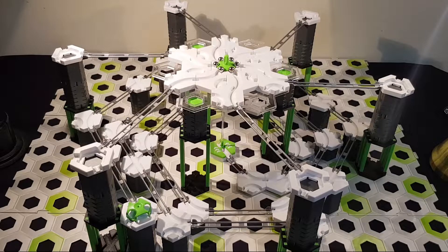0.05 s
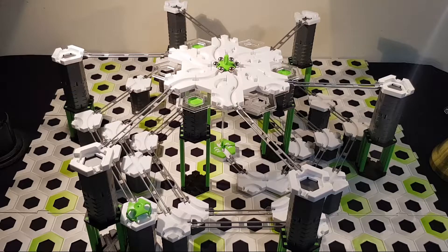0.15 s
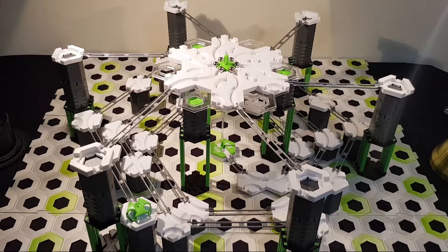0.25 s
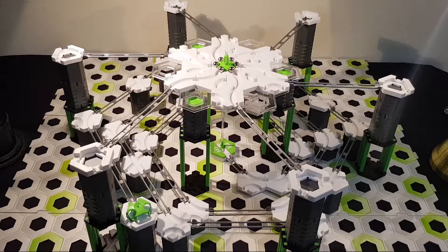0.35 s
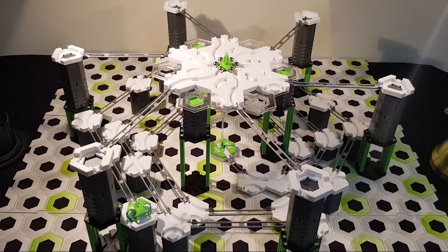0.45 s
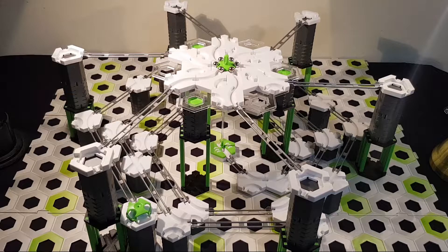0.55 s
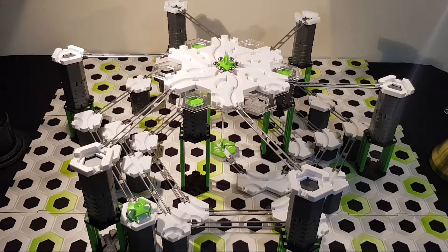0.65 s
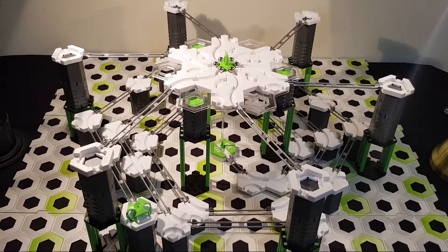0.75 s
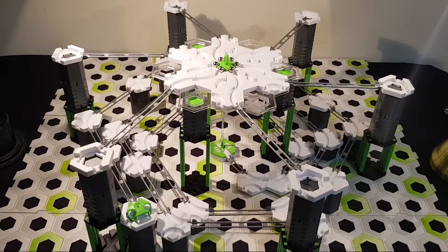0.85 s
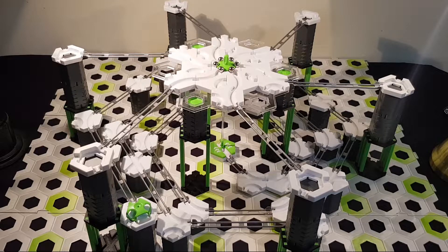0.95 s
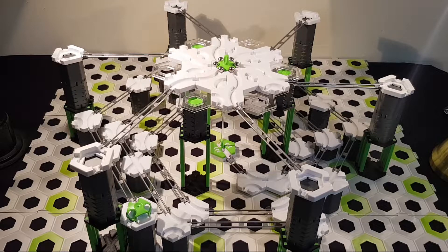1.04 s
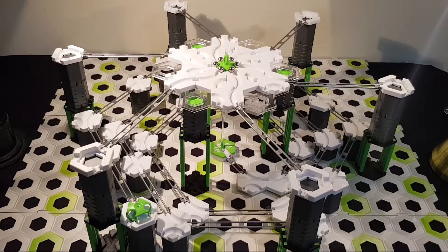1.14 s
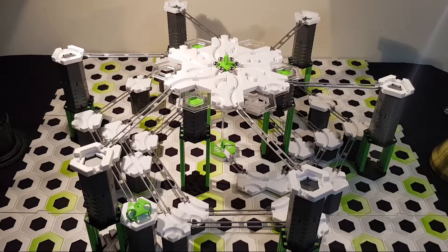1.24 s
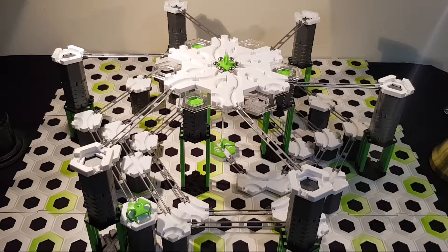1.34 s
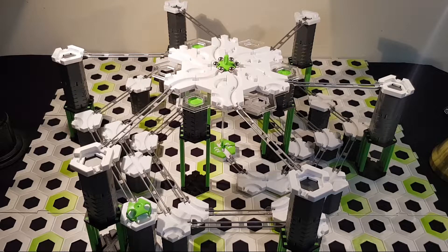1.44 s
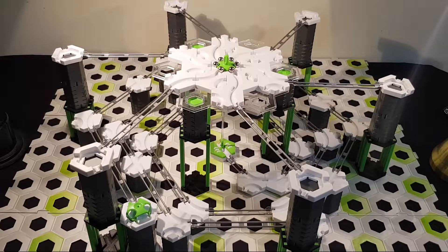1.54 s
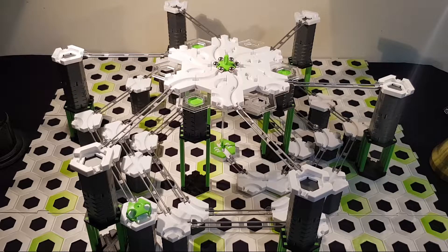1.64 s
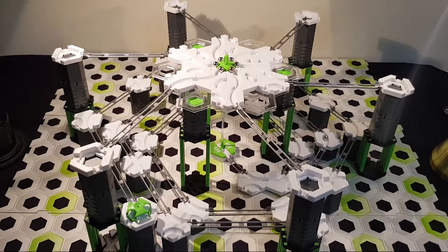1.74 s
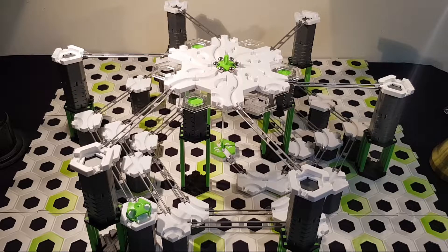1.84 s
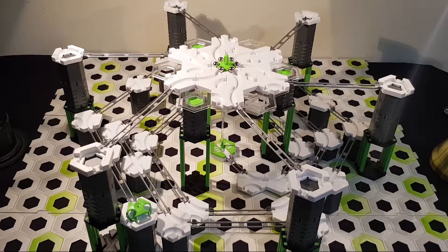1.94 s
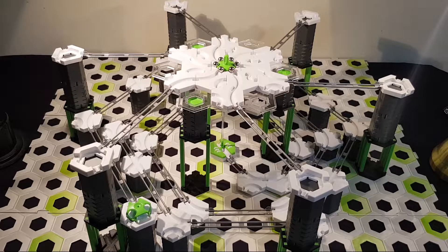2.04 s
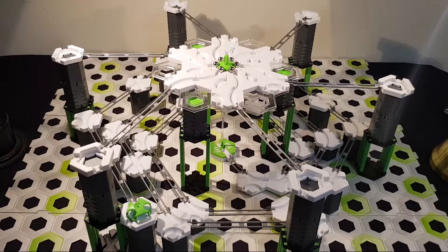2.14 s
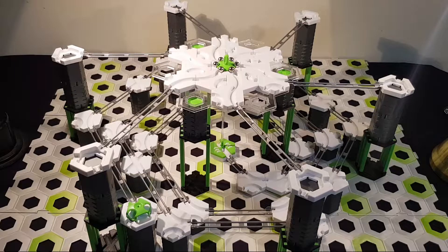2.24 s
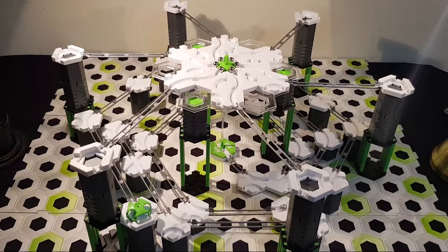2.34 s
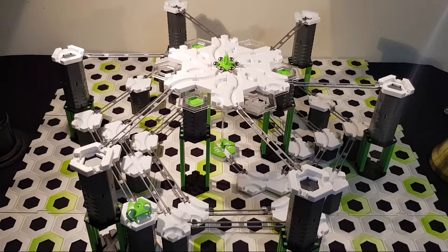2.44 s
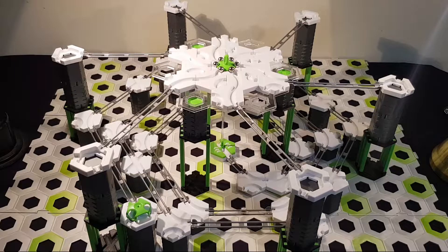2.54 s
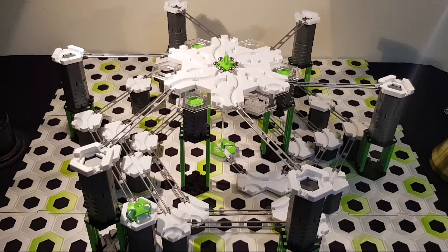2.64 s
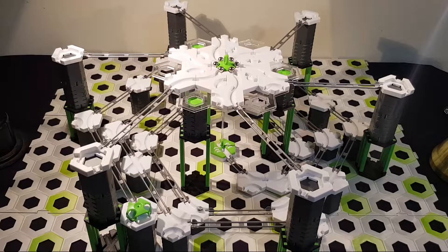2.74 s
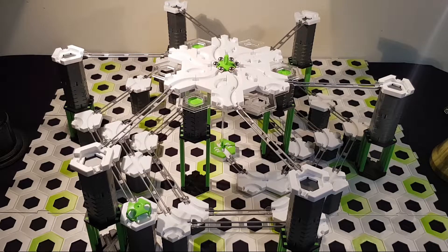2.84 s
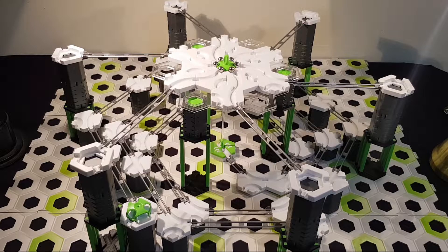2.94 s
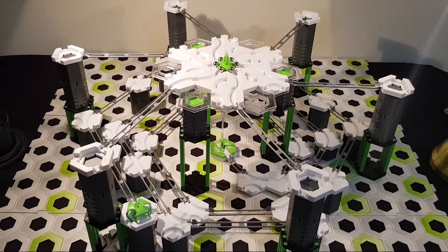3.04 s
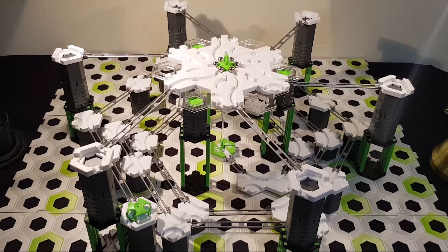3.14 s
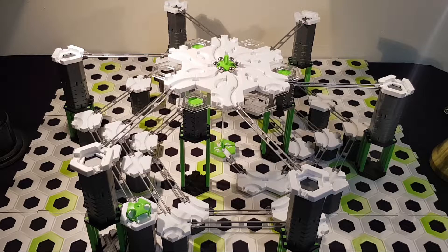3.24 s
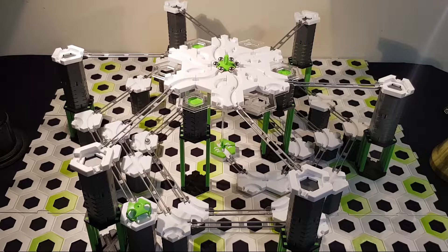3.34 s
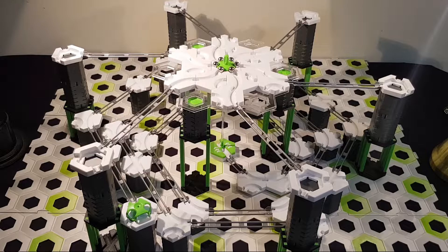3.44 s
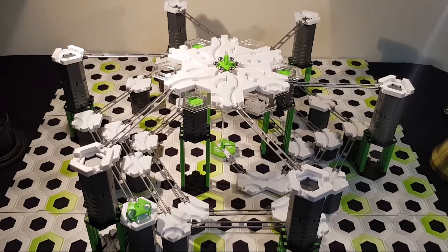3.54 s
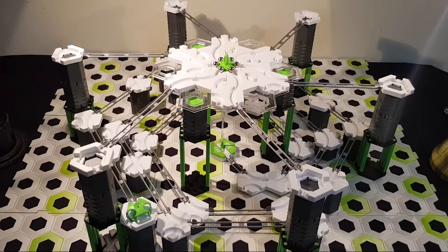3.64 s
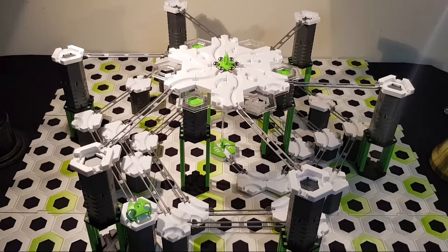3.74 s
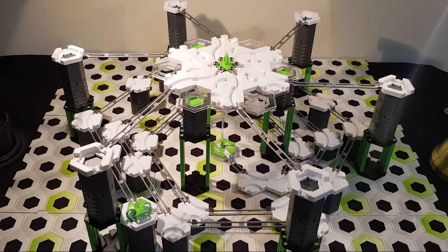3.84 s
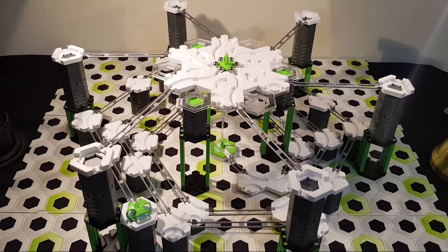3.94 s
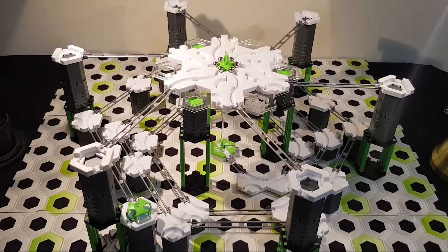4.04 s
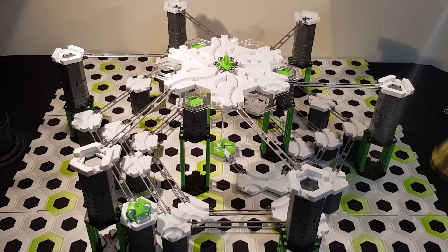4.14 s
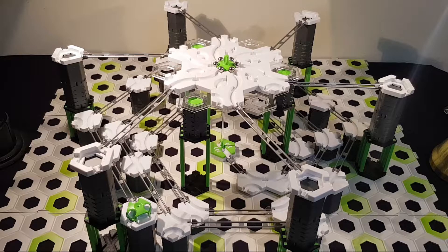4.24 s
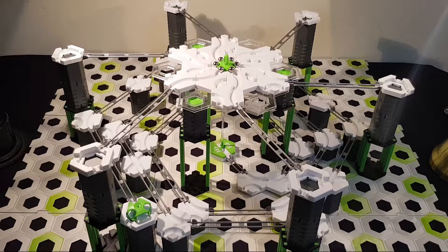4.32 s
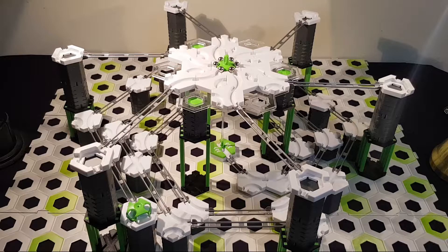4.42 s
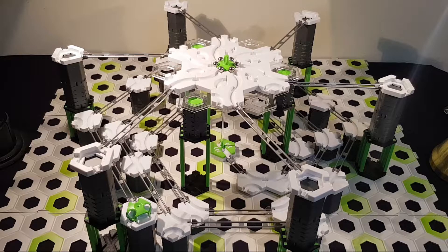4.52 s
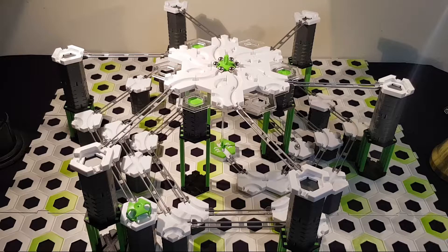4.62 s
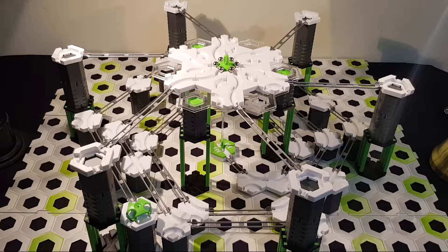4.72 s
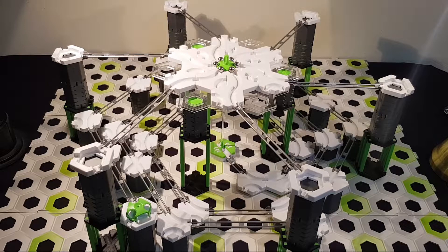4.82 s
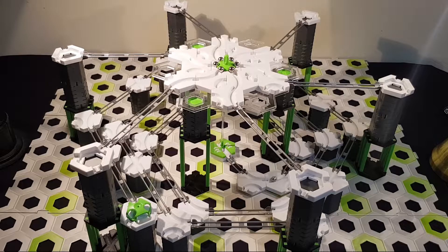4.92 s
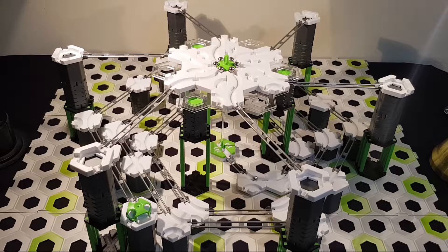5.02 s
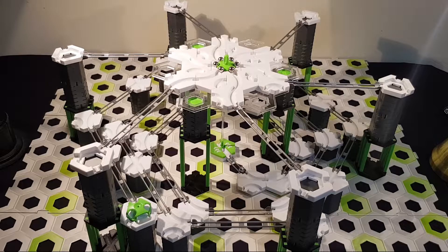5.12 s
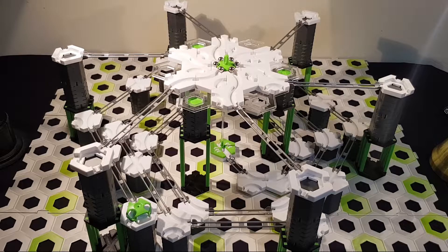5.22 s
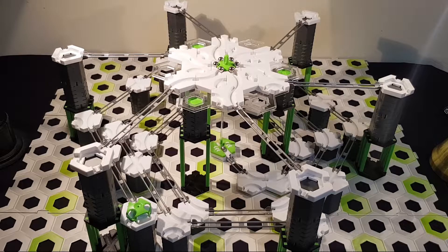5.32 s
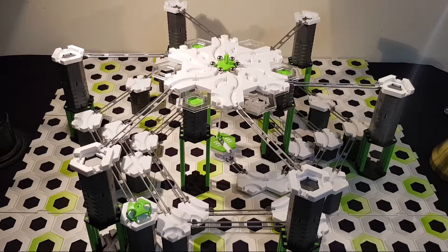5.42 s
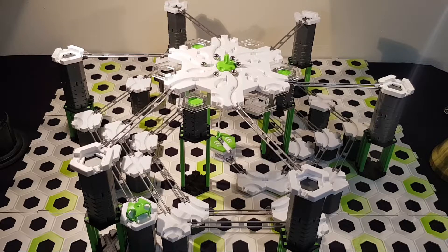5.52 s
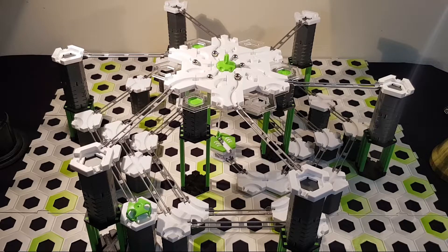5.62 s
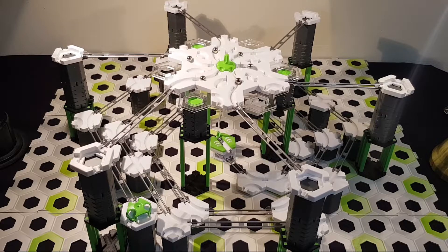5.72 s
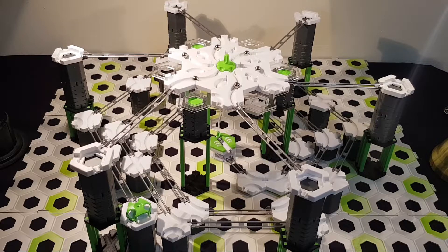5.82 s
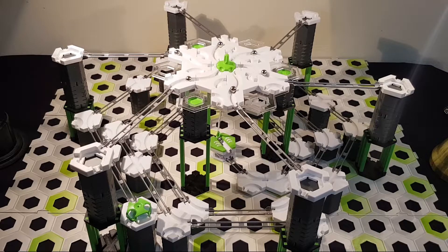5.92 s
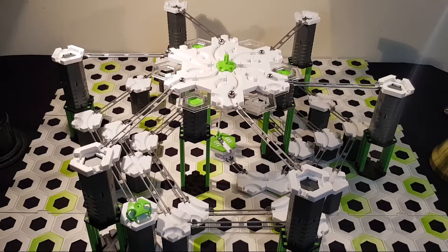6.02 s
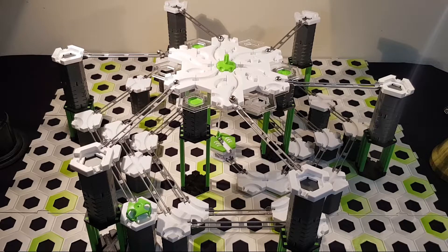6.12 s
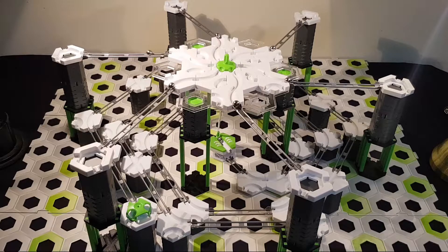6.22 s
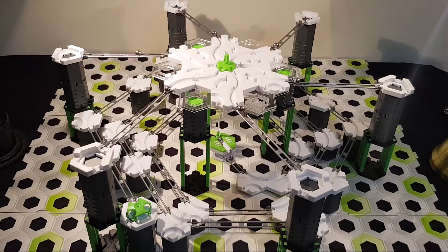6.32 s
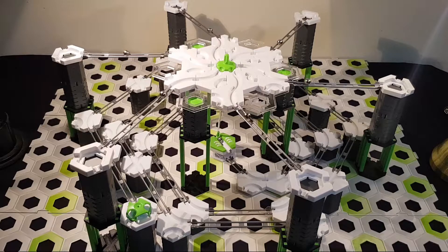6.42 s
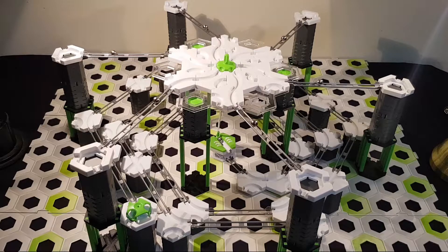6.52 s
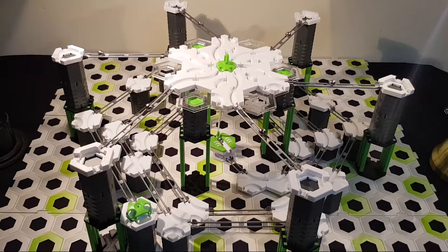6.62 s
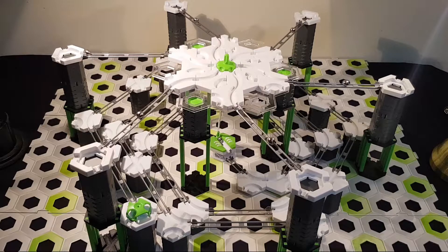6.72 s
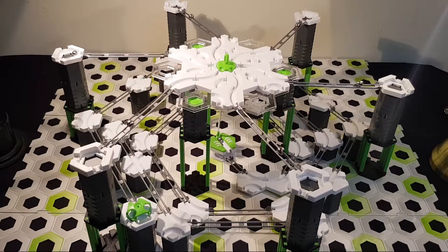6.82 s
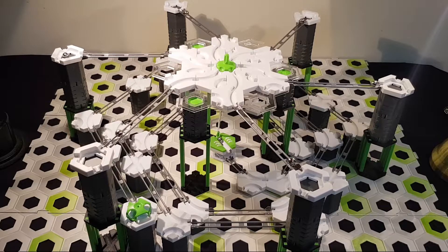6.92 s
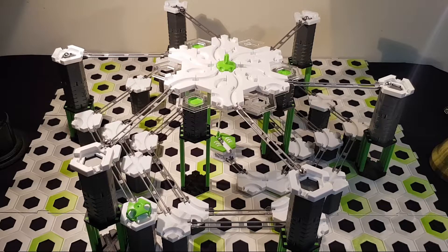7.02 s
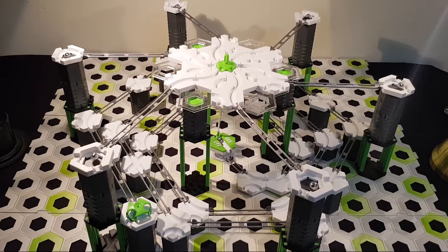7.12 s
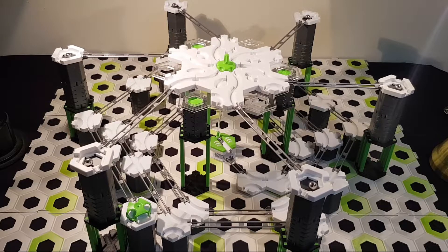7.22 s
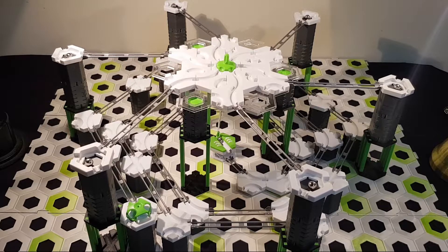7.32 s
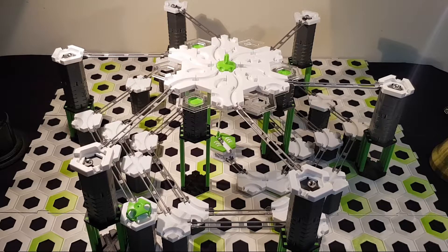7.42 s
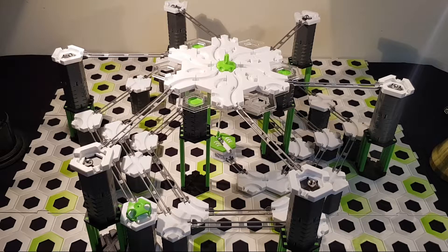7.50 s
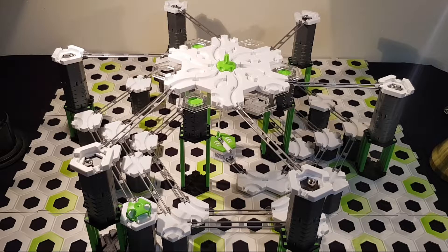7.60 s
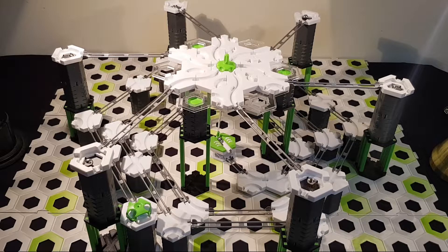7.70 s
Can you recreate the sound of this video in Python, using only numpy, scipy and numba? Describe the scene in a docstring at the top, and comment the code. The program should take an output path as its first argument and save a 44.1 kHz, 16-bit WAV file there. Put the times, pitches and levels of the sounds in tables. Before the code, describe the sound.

In a quiet room with a short, dry echo, a phone close to a tabletop marble run picks up steel balls on plastic tiles and metal rails. From 0 s they roll with a grainy, mid-high ring, crossing a hollow tile about every half second, with crisp irregular clicks at the joints; a harder snap comes near 1.7 s and another at 3.5 s. From 4.1 to 4.9 s the knocks crowd together, bright and quick, and sharp cracks hit at 5.3-5.4 s. From 5.5 to 6.7 s it eases into duller, hollow rolling that fades, with small ticks and one brighter tap near 6.3 s. Thuddy clacks at 6.85-6.9 s lead to the loudest moment, a dense metallic pile-up at 7.03-7.27 s. It stops quickly; one or two tiny taps around 7.6 s remain over low rumble and faint hiss.

```python
"""Marble run on a table, close to a phone

Steel marbles run down wire rails and over plastic tiles, an arm's length or less from a stereo phone in a
quiet room. Each knock is a burst of chattering contacts; rolling roughness rings the track piece underfoot,
and the tiles drum hollow. A last pile-up clatters into a cup. Decaying noise makes the room's answer,
coloured noise its low rumble and faint hiss, and the phone's gain ducks under the clatter."""
import sys
import numpy as np
from scipy import signal
from scipy.fft import rfft, irfft
from scipy.io import wavfile
from scipy.ndimage import uniform_filter1d
from numba import njit

SR = 44100
rng = np.random.default_rng(int(sys.argv[2]) if len(sys.argv) > 2 else 0)


def transcribe(u):
    """Save the signal u as a 16-bit wav file named by the first command-line argument.

    u: samples, shape (n,) or (channels, n), limited to [-1, 1]; the rate is SR.
    q: integer samples, one column per channel.
    """
    v = np.clip(np.atleast_2d(u).T, -1, 1)
    q = np.round(v * 32767).astype(np.int16)
    wavfile.write(sys.argv[1], SR, q)


N = 342206  # samples

# Source levels below are relative: marbles() trims each layer.
# Room noise, a spectrum. Each row: frequency in Hz, level in dB per Hz.
ROOM_NOISE = [(20, -40), (40, -6), (56, 10), (75, -8), (105, -2.5), (200, -18), (500, -28.5), (1500, -30),
              (3000, -37.5), (7300, -46.5), (12000, -34), (16000, -35)]
ROOM_NOISE_DB = -53.5
ROOM_T60_S, ROOM_DB, ROOM_SHARED_HZ = 0.25, -2, 900  # echo; the ports differ more above the last
LEFT_DB, SPREAD_S = 1.5, 0.00023  # left port up and right port down by this; lag of thuds at the right port
# Rolling on the rails, joined by straight lines. Each row: time in seconds, piece ring in dB, rattle in dB.
RAILS = [(0.0, -52, -56), (0.24, -66.5, -58), (1.77, -54.5, -50.5), (4.23, -56.5, -55), (4.69, -62, -48),
         (5.01, -52, -73), (5.38, -60, -36.5), (5.64, -47.5, -57.5), (6.53, -59.5, -58.5), (6.79, -55, -57),
         (7.07, -46.5, -33), (7.15, -48, -50), (7.37, -77.5, -80), (7.76, -93, -78)]
# Marbles crossing tiles. Each row: start in seconds, length in seconds, piece ring in dB, tile drum in dB,
# rattle in dB, tile pitch in Hz on entering, tile pitch in Hz on leaving.
CROSSINGS = [(-0.08, 0.19, -49, -47, -52, 330, 296), (0.532, 0.15, -49.5, -53.5, -68, 664, 574),
             (1.114, 0.17, -46.5, -52, -52, 810, 370), (1.667, 0.14, -49, -42, -61, 397, 398),
             (2.252, 0.16, -45.5, -53, -52, 660, 590), (2.711, 0.14, -42, -48, -48, 440, 464),
             (3.275, 0.2, -49.5, -52, -48, 533, 710), (3.685, 0.27, -42, -48, -41.5, 716, 744),
             (4.135, .1, -40, -44, -38, 480, 466), (4.541, 0.16, -41, -50.5, -55, 664, 630),
             (4.888, 0.27, -59.5, -50.5, -49.5, 696, 400), (5.202, 0.2, -58, -56, -57, 380, 470),
             (5.362, 0.14, -31.5, -41, -34, 730, 517), (5.539, 0.66, -49, -43.5, -70, 550, 690),
             (6.819, 0.2, -67.5, -39.5, -55.5, 457, 386), (7.031, 0.21, -41, -31.5, -21.5, 420, 534),
             (7.54, 0.058, -78, -64, -71, 787, 697)]
ON_S, OFF_DB_PER_S = 0.038, 179.5  # the tile takes the load, and falls silent once left
RING_SAG_DB, RATTLE_AT, RATTLE_WIDTH = 9.5, 0.77, 0.31  # ring fades across a tile; rattle peaks at this share
# Steel knocks at the joints. Each row: time in seconds, crack in dB, then piece ring, tile thud and bright
# edge in dB over the crack, and the chatter's 60 dB decay in seconds.
KNOCKS = [(0.052, -28.5, -13, -26, -15, 0.11), (0.121, -22.5, -6, -20, -10, 0.038),
          (0.3257, -55.5, -1, 16, -21, .044), (0.4992, -24.5, -37, -22, -12, 0.065),
          (0.5446, -28, 3.5, -3, -19, 0.032), (0.6892, -32.5, -3, -21, -26, 0.057),
          (0.7412, -35, -7.5, -19, -22, 0.069), (1.0854, -20.5, -29, -35, -10, 0.064),
          (1.1158, -24, -17, -16.5, -24, 0.11), (1.255, -33, -4.5, -17, -21.5, 0.2),
          (1.315, -19.5, -2.5, -42, -16.5, 0.037), (1.655, -23, -5, -32, -13, 0.033),
          (1.662, -10.5, -22, -32, -13, 0.029), (1.685, -19, -19, -39, -14, 0.062),
          (1.839, -27.5, -5.5, -16, -18, 0.082), (1.897, -18.5, -7, -20, -13, 0.038),
          (2.2448, -17.5, -37, -43, -13, 0.05), (2.272, -28, -1, -38, -21, 0.15),
          (2.4436, -22, -9, -34, -29, 0.032), (2.4855, -22.5, -14.5, -40, -26, 0.05),
          (2.5075, -31, -20, -26, -17, 0.024), (2.6838, -22, -15, -40, -24, 0.072),
          (2.7155, -21, -10, -17.5, -20, 0.068), (2.7748, -33, 16.5, -10, -31, 0.024),
          (2.862, -25.5, -40, -20, -13.5, 0.11), (2.92, -21.5, -17, -29, -17.5, 0.056),
          (3.151, -42.5, -11, -24, -21, 0.093), (3.2646, -20, -34, -26, -13, 0.054),
          (3.292, -15, -40, -38, -20, 0.046), (3.3208, -23, -30, -27, -14.5, 0.072),
          (3.444, -34, -32, -30, -22, 0.27), (3.501, -26, 4, -33, -11.5, 0.035),
          (3.5244, -10.5, -8, -33, -21, 0.019), (3.702, -19, -31, -36, -17, 0.058),
          (3.743, -19, -0.5, -16, -24, 0.034), (3.874, -30.5, -3, -50, -12.5, 0.086),
          (3.931, -29, -2.5, -33, -15, .067), (3.969, -34, 14.5, -19, -25, 0.022),
          (4.1225, -29, -11.5, -20, -11.5, 0.19), (4.1619, -14, -40, -40, -13, 0.058),
          (4.295, -21.5, -14, -38, -21, .046), (4.318, -16, -1, -38, -19, 0.018),
          (4.3491, -15.5, 0.5, -28, -10, 0.027), (4.375, -18, -22, -14, -20, 0.031),
          (4.471, -31, -30, -36, -17, 0.046), (4.521, -32.5, -13, -46, -24, 0.048),
          (4.5432, -6.5, -36, -47, -11.5, 0.02), (4.58, -16.5, -37, -45, -9.5, 0.032),
          (4.711, -29.5, -2.5, -33, -16, 0.039), (4.7394, -14.5, -29, -39, -18, 0.021),
          (4.774, -14, -1.5, -39, -12, 0.019), (4.8218, -16.5, -34, -34, -20, 0.037),
          (4.852, -21, -13, -25, -25, .03), (4.8685, -29.5, 2.5, -6.5, -17.5, 0.076),
          (4.9661, -43, 2, -13, -14, 0.037), (4.986, -37, 3, -12, -17, .077),
          (5.125, -27.5, -28, -28, -20.5, 0.051), (5.148, -15, -19, -8, -14.5, 0.022),
          (5.1982, -17.5, -22, -16, -25, 0.019), (5.234, -31, -38, -27.5, -12.5, 0.078),
          (5.2775, -37.5, -17.5, 2, -8, 0.083), (5.33, -7, -38.5, -15.5, -5.5, .025),
          (5.3909, -8.5, -1, -31.5, -8, 0.037), (5.467, -25, 9, -3, -25, 0.033),
          (5.478, -26, 13.5, 5, -30, .045), (5.5493, -26.5, 9, 5.5, -29, .034),
          (5.5913, -24, 4.5, -21, -18, 0.033), (5.629, -35.5, 14.5, 13, -35, 0.036),
          (5.7516, -44, 4, -24, -23, 0.054), (5.8924, -39, 13, -12, -16, 0.038),
          (5.9384, -39.5, 9.5, -28, -30, 0.062), (5.951, -45.5, 1, -28, -18, 0.071),
          (6.155, -38, 3.5, -13, -26, 0.059), (6.2756, -24.5, 5.5, -10, -4.5, 0.021),
          (6.36, -35.5, -14, -3.5, -14, 0.091), (6.429, -35, -0.5, -25, -30, 0.035),
          (6.7136, -33, -13, -8, -16, .073), (6.794, -41.5, -21, 8.5, -21.5, 0.092),
          (6.8425, -18, -3.5, 4.5, -12, .035), (6.8811, -10, -3.5, 2.5, -7.5, 0.034),
          (6.919, -14.5, -7, 3.5, -9.5, 0.056), (6.9955, -30.5, -5, -27, -11, 0.095),
          (7.0395, -11.5, -17, -18.5, -11.5, 0.046), (7.054, -21, 4.5, -21.5, -15.5, 0.032),
          (7.0646, -12.5, 0.5, -23.5, -10, 0.031), (7.0835, -6.5, -2, -32, -4.5, 0.021),
          (7.0953, 2, -11.5, -27.5, -21, 0.031), (7.1218, -6.5, 6.5, -24, -10, 0.021),
          (7.1336, -6.5, -1.5, -23, -11.5, 0.028), (7.1525, -3, -2.5, -20, -8, 0.033),
          (7.176, -7, -2, -13, -18, .03), (7.19, -7.5, -6, -20, -11.5, 0.034), (7.2, -16, 1, -28, -23, .04),
          (7.216, -16, -3, -23, -19, 0.053), (7.2454, -9, -5, -28, -13.5, 0.033),
          (7.27, -20.5, 2, -54, -25, 0.043), (7.5525, -46, 0.5, -17, -23.5, 0.11),
          (7.633, -52, -18, 12, -19, 0.058)]
RISE_S = 0.0029
KNOCK_PAN_DB, PAN_SCATTER_DB = 3, 1.5  # left over right
# Faint ticks at random moments. One row: crack in dB over the rail ring, scatter in dB, then ring, thud and
# edge in dB over the crack, and a decay in seconds that knocks() lifts to its shortest.
TICK = (12, 1, -9.5, -31, -9, -0.46)
TICKS = 45
# Hand-over of the marbles to the next track piece: times in seconds.
PIECE_FROM = [.5, 1.09, 1.661, 2.25, 2.691, 3.27, 3.7, 4.131, 4.54, 4.849, 5.361, 6.801, 7.54]
# Resonances of the track pieces in turn, a list for each. Each row: frequency in Hz, width in Hz (ring()
# widens narrow ones), level in dB relative to the others of its piece.
PIECES = [
    [(1280, 146, -2), (2810, 140, -11.5), (5150, 78, -14)],
    [(1570, 340, 5), (2070, 30, -15), (3070, 290, -12), (4740, 240, 1.5)],
    [(1438, 15, 1), (1564, 280, 15), (3180, 110, -2), (3900, 130, 6)],
    [(1580, 210, -5), (2400, 210, -12.5), (3860, 110, -15), (5040, 130, -23)],
    [(1578, 150, 8), (2410, 290, 4), (3770, 91, -2), (4970, 130, -4.5)],
    [(1402, 143, 12), (2860, 350, 2.5), (4860, 77, -3), (5100, 23, 1.5)],
    [(1470, 380, 15), (3080, 82, 4.5), (4400, 100, -22), (4980, 78, 6)],
    [(1486, 470, 11), (1815, 83, -1), (5200, 99, -10), (5630, 16, -20)],
    [(1300, 49, 4.5), (1850, 26, -1.5), (3430, 37, -15), (3904, 190, -0.5)],
    [(1355, 200, -2), (2690, 200, -8), (3940, 280, -1.5)],
    [(1570, 250, 4.5), (2770, 420, 2), (3950, 56, 0.5)],
    [(1053, 200, -6), (1335, 340, 9), (2760, 130, -3)],
    [(1384, 260, -3), (3000, 130, -38), (4200, 120, -29), (4540, 270, -9.5)],
    [(906, 12.4, -6), (1670, 110, -7)],
]
CLIMB = 0.036  # share by which a piece's modes rise while the marble runs along it
# Tile and table. One row: tile width in Hz, table board in Hz, board width in Hz, board level in dB.
TILE = (415, 105, 63, -11)
# Air under the tiles. One row: frequency in Hz, width in Hz, level in dB.
HOLLOW = (463, 94, -15)
# Steel crack, a spectrum. Each row: frequency in Hz, level in dB per Hz.
CRACK = [(410, -52.5), (700, -31), (1040, -20.5), (1250, -4), (2470, -12), (3160, -4.5), (3510, -10.5),
         (4000, -5), (4490, -6.5), (9000, -16), (11700, -37), (19800, -120)]
# Bright edge on the crack, a spectrum. Each row: frequency in Hz, level in dB per Hz.
EDGE = [(3530, -28), (6000, -0.5), (9900, -9.5), (10900, -0.5), (16000, -15)]
# Short ring of the struck spot, new at each knock. One row: lowest Hz, highest Hz, width in Hz, level in dB.
PING = (3700, 6200, 450, -13)


def undb(db):
    """Decibels to gain."""
    return 10 ** (np.asarray(db) / 20)


def unit(x):
    """Scale to rms 1."""
    return x / np.sqrt(np.mean(x ** 2))


def walk(rate, size):
    """Random levels, a new one each 1 / rate s, joined by slews; spread near 1."""
    k = int(SR / rate)
    steps = np.repeat(rng.standard_normal(size // k + 1), k)
    return uniform_filter1d(steps, k)[:size]


def colour(x, points):
    """Causal filter that follows (Hz, dB) points, built from the folded cepstrum; gain 1 for white noise."""
    hz, db = np.transpose(points)
    grid = np.maximum(np.fft.rfftfreq(8192, 1 / SR), 1)
    log_gain = np.interp(np.log(grid), np.log(hz), db) * np.log(10) / 20
    cepstrum = irfft(log_gain)
    cepstrum[1:4096] *= 2
    cepstrum[4097:] = 0
    response = irfft(np.exp(rfft(cepstrum)))
    response = response / np.linalg.norm(response)
    return signal.fftconvolve(x, response[None], axes=1)[:, :N]


def filtered(x, order, hz, kind="low"):
    """Butterworth filter, low-pass or high-pass."""
    return signal.sosfilt(signal.butter(order, hz, kind, fs=SR, output="sos"), x)


@njit
def svf(x, g, k):
    """State-variable band-pass with a moving centre, gain 1 there."""
    y, band, low = np.empty(len(x)), 0., 0.
    for i in range(len(x)):
        v = (band + g[i] * (x[i] - low)) / (1 + g[i] * (g[i] + k[i]))
        band = 2 * v - band
        low += 2 * g[i] * v
        y[i] = k[i] * v
    return y


def ring(x, hz, width):
    """One resonance applied twice for steep skirts, gain near 1 for white noise."""
    width = max(width, 35, hz.mean() / 30)
    g = np.tan(np.pi * hz / SR)
    k = 1.654 * width / hz
    return svf(svf(x, g, k), g, k) / np.sqrt(np.pi * width / SR)


def grit(scatter_db, share):
    """Tiny contacts on a share of the samples, a few much stronger than the rest."""
    hit = rng.random(N) < np.clip(share, .001, 1)
    strength = undb(scatter_db * np.minimum(rng.exponential(size=N), 6.5))
    return unit(hit * rng.standard_normal(N) * strength)


def quiet():
    """Wavering low rumble, alike left and right, under a faint unrelated hiss."""
    mid, side = colour(rng.standard_normal((2, N)), ROOM_NOISE)
    side = .17 * side + filtered(side, 1, 1200, "high")
    both = (mid + side * np.array([[1], [-1]])) * undb(0.5 * walk(4, size=N))
    return both * undb(ROOM_NOISE_DB + np.array([[LEFT_DB], [-LEFT_DB]]))


def room(dry):
    """Decaying-noise answer of the walls, more alike at the two ports in the bass."""
    age = np.arange(int(.6 * SR)) / SR
    mid, side = rng.standard_normal((2, len(age)))
    side = filtered(side, 1, ROOM_SHARED_HZ, "high")
    tail = mid + 0.75 * rng.standard_normal((2, len(age))) + side * np.array([[1], [-1]])
    tail = tail * undb(-60 * age / ROOM_T60_S) * np.minimum(age / 0.0049, 1)
    tail = tail / np.linalg.norm(tail, axis=1, keepdims=True)
    return undb(ROOM_DB) * signal.fftconvolve(dry, tail, axes=1)[:, :N]


def rolling():
    """Levels of ring, drum and rattle (dB) and tile pitch (Hz): the rails plus each crossing of a tile."""
    t = np.arange(N) / SR
    s, rail_ring_db, rail_rattle_db = np.transpose(RAILS)
    rail_ring = undb(np.interp(t, s, rail_ring_db))
    rail_rattle = undb(np.interp(t, s, rail_rattle_db))
    gains = np.array([rail_ring, np.full(N, 1e-5), rail_rattle])
    for on, length, ring_db, drum_db, rattle_db, _, _ in CROSSINGS:
        a, b = np.clip([int(on * SR), int((on + length) * SR) + SR // 2], 0, N)
        age = t[a:b] - on
        load = np.minimum(age / ON_S, 1) ** 2 * undb(-OFF_DB_PER_S * np.maximum(age - length, 0))
        across = age / length
        hump = np.exp(-((across - RATTLE_AT) / RATTLE_WIDTH) ** 2)
        sagging_ring = undb(ring_db - RING_SAG_DB * across)
        gains[:, a:b] += load * [sagging_ring, undb(drum_db + 0 * age), undb(rattle_db) * hump]
    on, length, *_, enter_hz, leave_hz = np.transpose(CROSSINGS)
    turns_s = np.ravel([on, on + length], "F")
    tile_hz = np.interp(t, turns_s, np.ravel([enter_hz, leave_hz], "F"))
    return *(20 * np.log10(gains)), tile_hz


def knocks():
    """Envelopes of the chatter after each knock and tick: crack and edge left and right, piece ring, thud."""
    env = np.zeros((6, N + SR))
    age = np.arange(SR // 4) / SR
    over_db, scatter_db, *colours = TICK
    when, size = rng.random(TICKS) * N / SR, rng.standard_normal(TICKS)
    rail_db = np.interp(when, *np.transpose(RAILS)[:2])
    tick_db = rail_db + over_db + scatter_db * size
    ticks = [(s, db, *colours) for s, db in zip(when, tick_db)]
    for s, db, ring_db, thud_db, edge_db, t60 in KNOCKS + ticks:
        decay = undb(-60 * age / np.clip(t60, .008, .3))
        fade = decay * (1 - np.exp(-age / RISE_S)) ** 2
        half_pan = (KNOCK_PAN_DB + PAN_SCATTER_DB * rng.standard_normal()) / 2
        layers = np.array([half_pan, -half_pan, edge_db + half_pan, edge_db - half_pan, ring_db, thud_db])
        at = int(s * SR)
        env[:, at:at + len(age)] += undb(db + layers)[:, None] * fade
    return env[:, :N]


def track(force):
    """The piece under the marbles rings; its modes slide and swell as the contact point travels."""
    out = np.zeros(N + SR)
    edges = [0] + [int(s * SR) for s in PIECE_FROM] + [N]
    for a, b, peaks in zip(edges, edges[1:], PIECES):
        push = np.concatenate([force[a:b], np.zeros(SR // 20)])  # room to ring out
        size = len(push)
        total = np.linalg.norm(undb(np.transpose(peaks)[2]))
        for hz, width, db in peaks:
            drift = walk(6.76, size=size)
            swell = walk(21.67, size=size) + walk(6.1, size=size)
            mode_hz = hz * (1 + 0.013 * drift + CLIMB * np.linspace(-.5, .5, size))
            out[a:a + size] += undb(db + 1.78 * swell) / total * ring(push, mode_hz, width)
    # a heavy ball presses too slowly to drive the far treble
    return filtered(out[:N], 2, 5200)


def tiles(drum_db, drum_hz, knock_env):
    """Rolling load and knocks drum the tile and the air under it; the hard blows shake the table board."""
    load = grit(2.2, .1) * (undb(drum_db - 5.0 + 2.0 * walk(30, size=N)) + undb(-8.0) * knock_env)
    # doubled dB: only the heaviest drumming reaches the board
    blows = grit(2.0, 0.19) * (knock_env + undb(2 * drum_db + 39.5))
    width, board_hz, board_width, board_db = TILE
    hollow_hz, hollow_width, hollow_db = HOLLOW
    tile = filtered(ring(load, drum_hz, width), 2, 1600)
    board = undb(board_db) * ring(blows, np.full(N, 1. * board_hz), board_width)
    hollow = undb(hollow_db) * ring(load, np.full(N, 1. * hollow_hz), hollow_width)
    return tile + board + hollow


def steel(env, rattle):
    """Scattered contacts coloured as a broad crack and a bright edge, with a ping of the struck spot."""
    # each port sees its own part of the scattered treble
    chatter = .4 * grit(2.0, .5) + .92 * np.array([grit(2.0, .5), grit(2.0, .5)])
    chatter = chatter * undb(3.5 * walk(220, size=N))  # rebounds come in lumps
    crack = colour(chatter * (undb(-8.5) * env[:2] + rattle), CRACK)
    edge = colour(chatter * (undb(3.5) * env[2:4] + undb(-17.0) * rattle), EDGE)
    low_hz, high_hz, width, ping_db = PING
    struck = np.searchsorted(np.transpose(KNOCKS)[0], np.arange(N) / SR)
    spot_hz = (low_hz * (high_hz / low_hz) ** rng.random(len(KNOCKS) + 1))[struck]
    ping = undb(ping_db) * np.array([ring(c, spot_hz, width) for c in chatter * env[:2]])
    return crack + edge + ping


def marbles():
    """Knocks and rolling roughness drive the track pieces, the hollow tiles and a broad steel crack."""
    piece_db, drum_db, rattle_db, drum_hz = rolling()
    env = knocks()
    bumpy = undb(2.98 * walk(45, size=N))  # flats and seams make the rolling uneven
    rings = track(grit(3.16, .3) * (undb(piece_db) * bumpy + undb(-2.0) * env[4]))
    thuds = tiles(drum_db, drum_hz, env[5])
    late = np.roll(thuds, int(SPREAD_S * SR))  # the wide table reaches the ports at unlike times
    sides = undb(np.array([[LEFT_DB], [-LEFT_DB]]))
    rattle = undb(rattle_db - 13.5) * bumpy * sides
    return steel(env, rattle) + sides * (rings + np.array([thuds, late]))


def scene():
    """Marbles, their echo and the still room."""
    dry = marbles()
    return dry + room(dry) + quiet()


def duck(x, top_db, share, attack_s, release_db):
    """Gain that takes back a share of the smoothed level over top_db; the held level falls release_db a second."""
    pole = np.exp(-1 / (attack_s * SR))
    db = 10 * np.log10(signal.lfilter([1 - pole], [1, -pole], x ** 2) + 1e-12)
    slope = release_db * np.arange(len(x)) / SR
    held = np.maximum.accumulate(db + slope) - slope
    return undb(-share * np.maximum(held - top_db, 0))


def record(dry):
    """Phone: gain control ducks after long loud clatter; a steep filter cuts the top."""
    gain = duck(dry.mean(axis=0), top_db=-33.5, share=0.32, attack_s=0.14, release_db=2.5)
    top_cut = signal.ellip(10, .2, 70, 15900, fs=SR, output="sos")
    return signal.sosfilt(top_cut, dry * gain)


dry = scene()
out = record(dry)
transcribe(out)
```